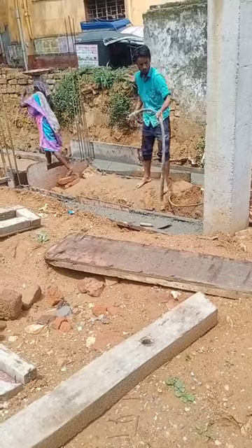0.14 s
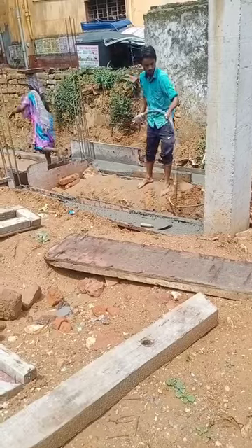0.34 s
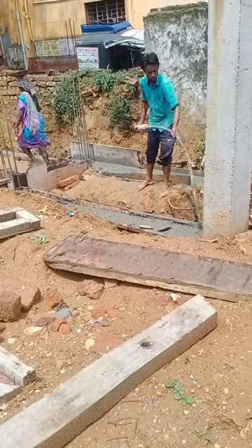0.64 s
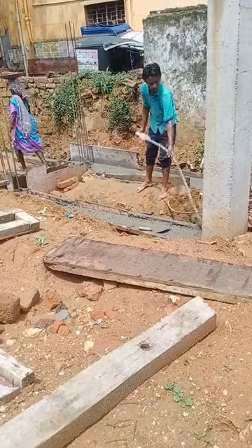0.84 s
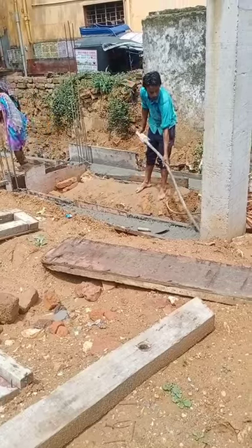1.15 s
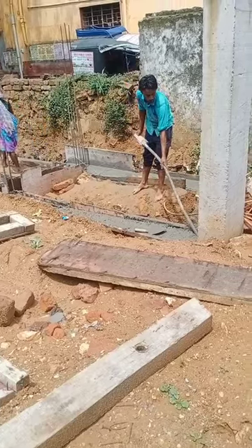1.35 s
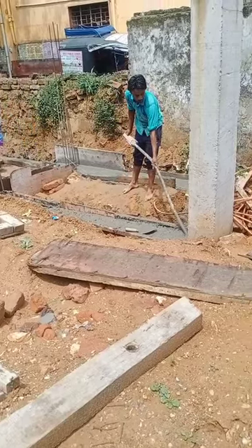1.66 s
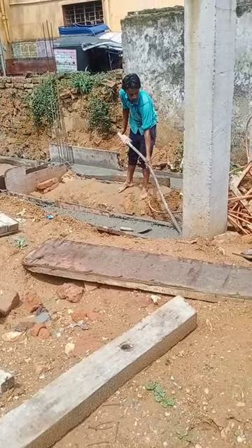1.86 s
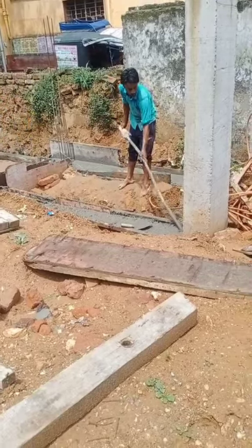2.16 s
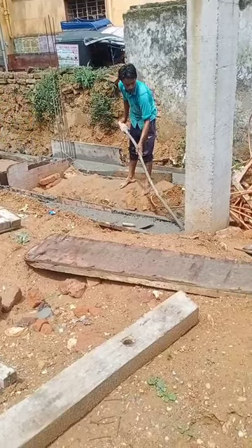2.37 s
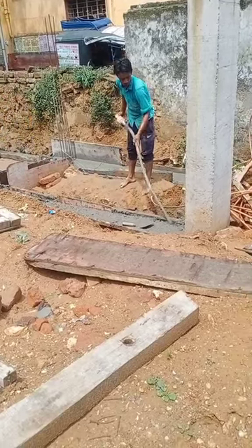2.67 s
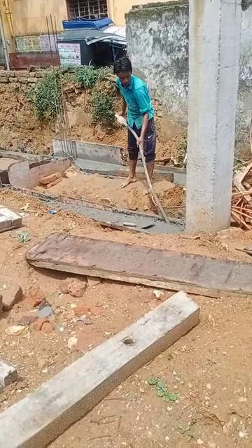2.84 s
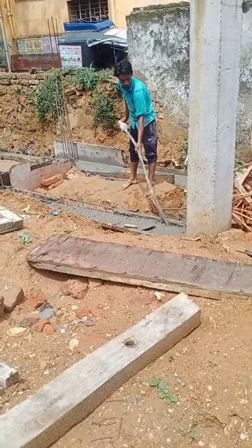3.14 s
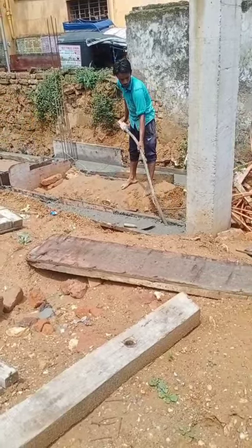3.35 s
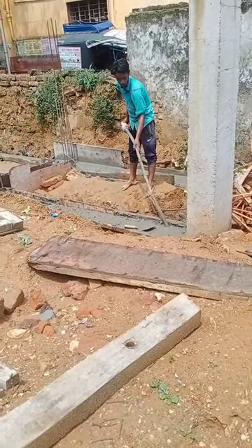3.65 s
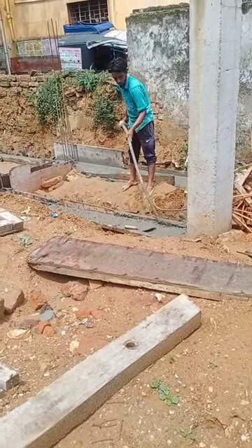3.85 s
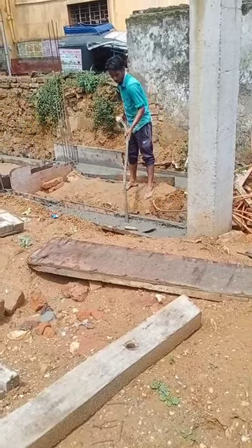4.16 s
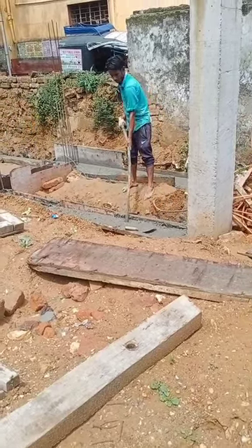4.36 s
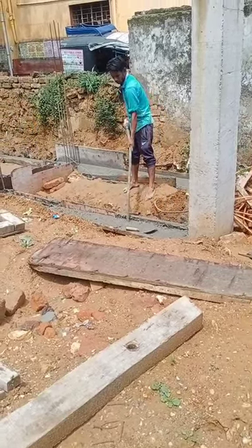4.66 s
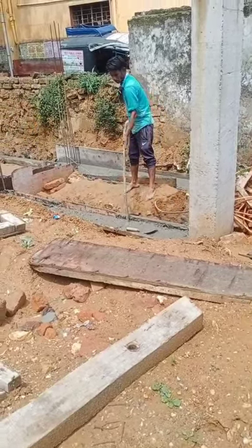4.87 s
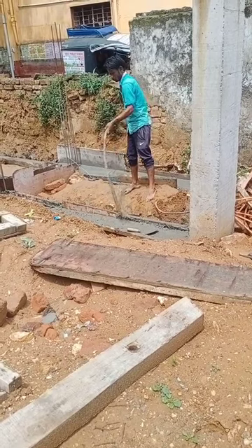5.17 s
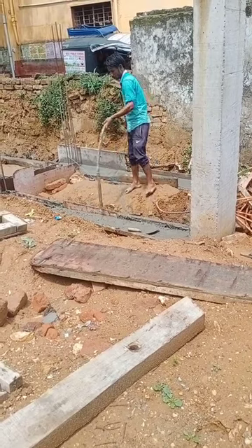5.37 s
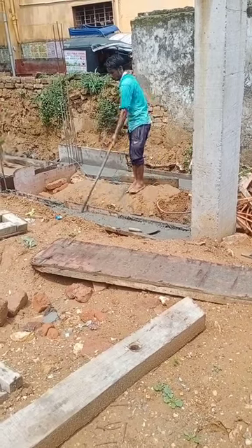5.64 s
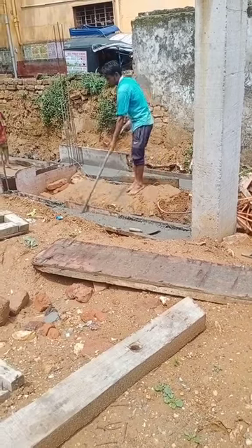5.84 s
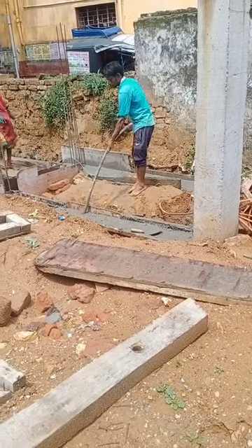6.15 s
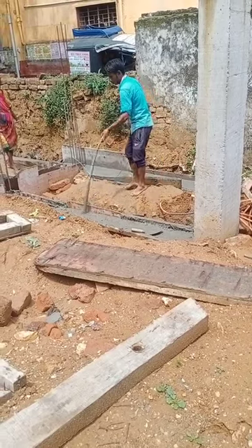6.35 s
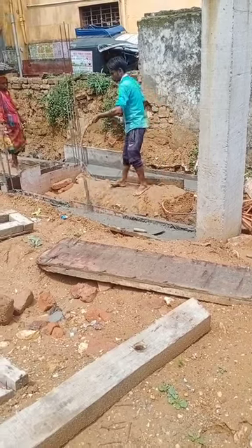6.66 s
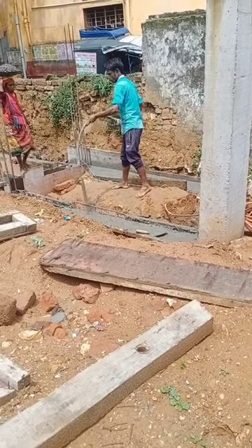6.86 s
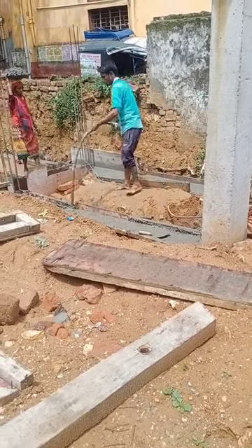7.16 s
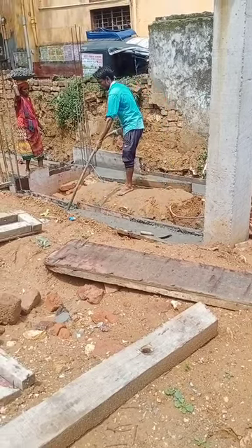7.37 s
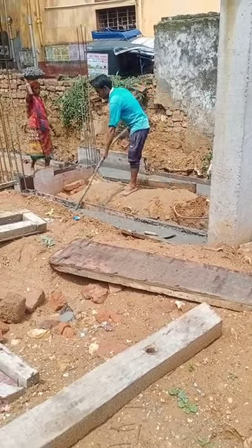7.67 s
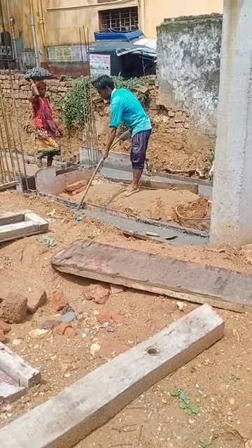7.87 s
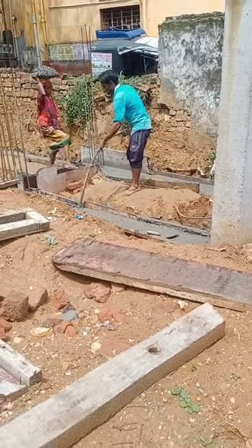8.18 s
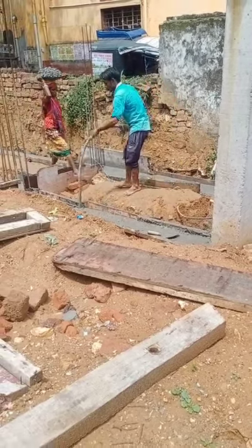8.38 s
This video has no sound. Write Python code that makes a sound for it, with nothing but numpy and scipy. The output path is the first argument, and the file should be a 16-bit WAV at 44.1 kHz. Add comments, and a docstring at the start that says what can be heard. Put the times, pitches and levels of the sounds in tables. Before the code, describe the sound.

A concrete vibrator runs without a break on an open building site, a motor-like hum under a bright, rasping steel rattle. Five times the needle sinks into fresh concrete: the hum drops, turns rough and buzzes while the mix grumbles, then it climbs again. Brief high squeals and ringing come from the steel. The air rumbles softly, a far engine drones faintly, and a short low thud comes just past the middle.

```python
"""A needle vibrator, a steel tube with a spinning weight inside, is dipped five times into fresh concrete.
The weight (the rotor) hums, slowing and turning rough whenever the concrete grips it. Rotor and
flexible shaft rattle in their casing, which rings now and then, and the needle squeals against steel.
The shaken mix grumbles and the air of the open building site rumbles. A far engine gives faint,
climbing drones, and there is one short, louder low thud at about 5.2 s."""
import sys
import numpy as np
from scipy import signal
from scipy.fft import rfft, irfft
from scipy.io import wavfile
from scipy.ndimage import uniform_filter1d

SR = 44100
rng = np.random.default_rng(int(sys.argv[2]) if len(sys.argv) > 2 else 0)


def unload_wav(signal):
    """Save mono or channel-first audio to the path in sys.argv[1] as 16-bit WAV at rate SR, clipped to [-1, 1]."""
    wavfile.write(
        sys.argv[1],
        SR,
        np.round(np.clip(np.atleast_2d(signal).T, -1, 1) * 32767).astype(np.int16),
    )


N = 375423
TIME = np.arange(N) / SR
FREQS = np.maximum(np.fft.rfftfreq(2 ** 19, 1 / SR), 1)
FREE_HZ = 269.66  # rotor turns per second with the needle in the air

# dips of the needle: start/s, pulled out/s, time to sink/s, slowing by drag/Hz, hum level/dB,
# grip of the concrete/0-1, slap of the bent shaft/0-1
DIPS = [(0.838, 2.448, 0.67, 47, -30, 0.44, 0.42), (2.645, 3.881, 0.47, 48, -29, 0.47, 0.26),
        (4.167, 5.169, .5, 43.2, -24, 0.67, 0), (5.691, 6.547, .15, 56, -27.5, .5, 0.3),
        (7.42, 8.702, 0.073, 53, -26, 0.31, 0.47)]


def from_db(db):
    return 10 ** (np.asarray(db) / 20)


def rms_one(x):
    """Scale a signal to an average strength (rms) of 1."""
    return x / np.sqrt(np.mean(np.abs(x) ** 2) + 1e-20)


def level_curve(points):
    """Join (time, level) points with straight lines."""
    return np.interp(TIME, *np.transpose(points))


def between(start, end, fade_s):
    """Fade in from start, hold at 1, fade out by end."""
    return np.clip(np.minimum(TIME - start, end - TIME) / fade_s, 0, 1)


def swell(middle, half_s):
    """A smooth rise and fall of height 1."""
    return np.exp(-((TIME - middle) / half_s) ** 2)


def drift(rate_hz):
    """A smooth random wobble of typical size 1; a higher rate wobbles faster."""
    r = np.exp(-80 * np.pi * rate_hz / SR)
    noise = rng.standard_normal(N // 40 + 2002)  # one value every 40 samples
    slow = signal.lfilter([1], [1, -2 * r, r * r], noise)[2000:]
    return np.interp(np.arange(N) / 40, np.arange(len(slow)), rms_one(slow))


def filtered(x, gain):
    """Turn each frequency up or down by its own gain."""
    return irfft(rfft(x, 2 * len(FREQS) - 2) * gain)[:N]


def coloured(x, spectrum):
    """Give x a tone colour that rings after each hit, never before it (minimum phase)."""
    hz, db = np.transpose(spectrum)
    gain = from_db(np.interp(np.log(FREQS), np.log(hz), db))
    cepstrum = irfft(np.log(gain))
    response = np.exp(rfft(2 * cepstrum[:len(FREQS) - 1], len(cepstrum)))
    return rms_one(filtered(x, response))


def resonance(x, hz, width_hz):
    """Let x ring at one pitch; a narrower width rings longer."""
    r = np.exp(-np.pi * width_hz / SR)
    section = [1, 0, -1, 1, -2 * r * np.cos(2 * np.pi * hz / SR), r * r]
    return rms_one(signal.sosfilt([section, section], x))


def needle_depths(pull_out_s=.1):
    """Depth from 0 to 1, one row per dip: the needle sinks steadily, stays, and comes out quickly."""
    return np.array([np.clip((TIME - start) / sink_s, 0, 1) * np.clip((end - TIME) / pull_out_s, 0, 1)
                     for start, end, sink_s, *_ in DIPS])


def rotor_speed(drag_hz, grip, inertia_s=.277, start_lag_hz=14, waver_hz=1.96):
    """The heavy rotor takes time to slow down or speed up; gripping concrete makes it waver."""
    r = np.exp(-1 / (inertia_s * SR))
    lost_hz = signal.lfilter([1 - r], [1, -r], drag_hz, zi=[start_lag_hz])[0]
    return FREE_HZ - lost_hz + waver_hz * grip * drift(7.79)


def hum_gains(depth, held_db, turn, grip, sputter_db=3.0):
    """Strength of the low hum, which sputters under load, and of the buzz an octave above it."""
    # the needle presses on something hard (+) or slips off (-): middle/s, half length/s, change/dB
    jolts = [(1.14, 0.12, -10), (1.335, 0.014, 9), (1.92, 0.087, 7), (1.987, 0.02, -14),
             (2.093, 0.047, 8.5), (2.193, .03, -14), (2.595, 0.89, -2), (3.07, 0.047, 7.5),
             (5.102, 0.04, -14), (5.967, 0.052, -9), (6.154, 0.044, 7.5), (6.378, 0.064, 11),
             (6.446, .015, -8), (6.701, 0.18, -6), (7.87, 0.21, 8.5), (8.322, 0.069, -11)]
    # the needle bites on stones and buzzes: start/s, end/s, level/dB
    bites = [(0.88, 1.155, -46), (1.2, 2.126, -44), (2.102, 2.494, -39.5), (2.59, 2.965, -46.5),
             (2.95, 3.224, -34.5), (3.23, 3.895, -33), (4.264, 4.565, -42.5), (4.586, 4.895, -33.5),
             (4.92, 5.22, -32.5), (5.806, 6.117, -37), (6.116, 6.542, -36), (7.48, 7.825, -44),
             (7.95, 8.599, -42)]
    free_db = -32 + 4 * turn  # needle in the air
    jolts_db = sum(db * swell(middle, half_s) for middle, half_s, db in jolts)
    low_db = free_db * (1 - depth.sum(0)) + held_db @ depth + jolts_db
    low_db += sputter_db * grip * drift(14.3)
    buzz = sum(from_db(db) * between(start, end, fade_s=.07) for start, end, db in bites)
    return from_db(low_db), from_db(-66.5) + buzz


def rotor_hum(angle, grip, turn, low_gain, octave_gain):
    """The off-centre rotor shakes the needle: smooth when free, unsteady when stones jostle it."""
    # overtones and bearing whine: multiple of the rotor speed, relative level free/dB, fully gripped/dB
    whine_tones = [(3, -69.5, -36.5), (5.3, -40, -76), (6, -42.5, -69), (7.7, -48, -31), (8, -38, -48),
                   (8.25, -39.5, -44), (10, -40, -54), (12, -37, -56)]

    def tone(multiple, rough, rate_hz):
        shake = 1 + rough * (drift(rate_hz) + 1j * drift(rate_hz))  # wobbles loudness and pitch
        return np.sqrt(2) * np.real(shake * np.exp(1j * multiple * angle)) / np.sqrt(1 + 2 * rough ** 2)

    low = low_gain * tone(0.99, rough=.07 + 0.34 * grip ** 2, rate_hz=22)
    octave = octave_gain * tone(2, rough=0.48, rate_hz=24.3)
    whine = sum(from_db(free + (held - free) * grip) * tone(multiple, rough=0.99, rate_hz=9.9)
                for multiple, free, held in whine_tones)
    return low + octave + from_db(-3.0 + 3.5 * turn) * whine


def steel_hits(angle, slap, hits_per_s=9000, shaft_per_rotor=.258):
    """Countless tiny hits of steel on steel, harder once per rotor turn and once per shaft turn."""
    sizes = from_db(2.5 * np.minimum(rng.exponential(1, N), 3.5)) * rng.choice([-1, 1], N)
    shaft_angle = shaft_per_rotor * angle
    shaft_swing = np.cos(shaft_angle) + 0.21 * np.cos(2 * shaft_angle)
    force = np.exp(0.089 * np.cos(angle) + .58 * slap * shaft_swing)
    force /= np.sqrt(uniform_filter1d(force ** 2, size=3000))  # keep the pulsing, even out the loudness
    struck = rng.random(N) < hits_per_s / SR
    flutter = from_db(0.83 * drift(23))
    return rms_one(sizes * struck * force * flutter)


def shifting_tones(x, patchy_db=3.0):
    """As hose and needle move, their many narrow ringing tones swell and fade."""
    bands = signal.stft(x, nperseg=1024)[2]
    patches = uniform_filter1d(rng.standard_normal(bands.shape), size=16, axis=1)
    bands = bands * from_db(patchy_db * rms_one(patches))
    return rms_one(signal.istft(bands)[1][:N])


def rattle(hits, turn, speed, band_edges_hz=(570, 2500, 4900, 8800)):
    """The hits sound through hose and casing: a clatter, a bright rasp and a fizz on top."""
    # tone colour of the steel casing and hose: f/Hz, relative level/dB
    steel_colour = [(330, -46), (560, -17), (617, -23.5), (709, -14.5), (874, -9), (1030, -13.5),
                    (1360, -5), (2410, -5.5), (3810, -3.5), (4960, -5.5), (5700, 5), (6370, 4), (9140, -36),
                    (14700, 9), (15500, -10)]
    # loudness of the hose's clatter: t/s, relative level/dB
    clatter_levels = [(0.12, -29), (0.68, -28.5), (0.79, -30), (1.46, -27), (1.79, -30.5), (3.11, -27),
                      (3.25, -29), (5.13, -25.5), (5.52, -30), (5.92, -24.5), (6.08, -28.5), (7.52, -29.5),
                      (8.08, -36), (8.45, -29.5)]
    # loudness of the bright rasp: t/s, relative level/dB
    rasp_levels = [(.1, -24.5), (2.2, -25.5), (2.9, -24), (4.2, -26), (5.6, -23.5), (8.5, -22)]
    # tone colour of each hit's sharp edge: f/Hz, relative level/dB
    fizz_colour = [(6000, -34), (8500, -4), (9200, -10), (10500, -5.5), (11300, -8), (12800, 0.5),
                   (15500, 0.5)]
    steel = coloured(shifting_tones(hits), steel_colour)
    above = [1 / (1 + (hz / FREQS) ** 20) for hz in band_edges_hz]  # each passes what lies above its edge
    hose_db = level_curve(clatter_levels) - 1.85
    casing_db = -21 - 2.5 * turn
    rasp_db = level_curve(rasp_levels) - 0.83
    body = sum(from_db(db) * rms_one(filtered(steel, above[k] - above[k + 1]))
               for k, db in enumerate([hose_db, casing_db, rasp_db]))
    fizz_db = -36.0 + 0.0446 * (speed - FREE_HZ)  # a faster rotor strikes more sharply
    return body + from_db(fizz_db) * coloured(hits, fizz_colour)


def casing_ring(hits, wander_db=1.5):
    """Where nothing muffles the steel, the hits build up ringing tones."""
    # steel tones that sing faintly throughout: f/Hz, width/Hz, level/dB
    lasting_tones = [(7326, 45, -47), (8242, 70, -57), (10165, 130, -66)]
    # tones that ring for a while: start/s, end/s, f/Hz, width/Hz, level/dB; the 1625 Hz and 1405 Hz rows are
    # the rotor's whine at about 6 and 5.3 times its speed
    passing_tones = [(.05, .58, 3700, 1100, -27.5), (.5, .9, 1625, 25, -38), (.5, .9, 7345, 30, -38),
                     (.62, 1.05, 3217, 22, -27.5), (1.0, 2.42, 3640, 300, -28), (1.1, 1.6, 1950, 130, -33),
                     (2.4, 3.1, 8250, 70, -52), (2.6, 4.4, 7326, 25, -42), (5.1, 5.36, 7326, 25, -34),
                     (6.8, 7.45, 1405, 30, -38), (6.8, 7.25, 7326, 30, -40), (7.55, 8.3, 3600, 480, -30)]
    ring = sum(from_db(db + wander_db * drift(1.2)) * resonance(hits, hz, width)
               for hz, width, db in lasting_tones)
    for start, end, hz, width, db in passing_tones:
        ring += from_db(db) * between(start, end, fade_s=.07) * resonance(hits, hz, width)
    return ring


def needle_squeal(pitch_hz=3889, waver_hz=6, chatter_db=2.5):
    """The needle rubs on steel and keeps one high, chattering tone going."""
    # short bursts and one weaker, longer rub: start/s, end/s, level/dB
    rubs = [(.1, .24, -22.5), (3.27, 4.17, -28.5), (3.53, 3.625, -26.5), (3.665, 3.745, -24),
            (3.81, 3.89, -26.5), (3.94, 3.99, -27.5)]
    rub = sum(from_db(db) * between(start, end, fade_s=.016) for start, end, db in rubs)
    angle = 2 * np.pi * np.cumsum(pitch_hz + waver_hz * drift(27.0)) / SR
    return rub * from_db(chatter_db * drift(38)) * np.sqrt(2) * np.sin(angle)


def concrete_grumble(grip):
    """The shaken mix churns with a low grumble, louder the harder it grips."""
    # tone colour of the churning mix: f/Hz, relative level/dB
    mix_colour = [(25, -80), (60, -40), (110, -5), (190, 6), (240, 8.5), (340, -4.5), (480, -6), (650, -19),
                  (1200, -56)]
    return from_db(-37 + 2.0 * drift(24)) * grip * coloured(rng.standard_normal(N), mix_colour)


def air_rumble(air_db=-62, waver_db=3.0):
    """The open air rumbles softly, and one gust stirs it."""
    # tone colour of the open air: f/Hz, relative level/dB
    air_colour = [(20, -7), (60, 0), (110, 3), (300, -8), (2000, -28)]
    # the gust: middle/s, half length/s, rise/dB
    gust = (5.8, 0.83, 12)
    middle, half_s, rise_db = gust
    level_db = air_db + rise_db * swell(middle, half_s) + waver_db * drift(4)
    return from_db(level_db) * coloured(rng.standard_normal(N), air_colour)


def far_engine_and_thud(waver_db=6.1):
    """Faint, climbing drones of a far engine, and one short, louder low thud at about 5.2 s."""
    # three engine drones and the thud (third row): start/s, end/s, first f/Hz, last f/Hz, level/dB
    low_tones = [(1.994, 3.056, 88.4, 103, -52), (4.05, 4.65, 159, 168, -46.5),
                 (5.12, 5.35, 164, 167, -37.5), (5.546, 5.944, 170, 181, -49)]
    sound = np.zeros(N)
    for start, end, first_hz, last_hz, db in low_tones:
        hz = np.interp(TIME, [start, end], [first_hz, last_hz])
        gain = from_db(db + waver_db * drift(35)) * between(start, end, fade_s=0.11)
        sound += gain * np.sqrt(2) * np.sin(2 * np.pi * np.cumsum(hz) / SR)
    return sound


def scene(free_grip=0.1, free_slap=0.034):
    """The dips slow the rotor, and that one speed drives both hum and rattle."""
    depth = needle_depths()
    drag_hz, held_db, held_grip, held_slap = np.transpose(DIPS)[3:]
    grip = np.clip(free_grip + (held_grip - free_grip) @ depth, 0, 1)
    slap = np.clip(free_slap + (held_slap - free_slap) @ depth, 0, 1)
    # from 2 to 6 s the worker turns and leads the hose to the other side, shifting the sound's balance
    turn = np.interp(TIME, [2.0, 6.0], [0, 1])
    speed = rotor_speed(drag_hz @ depth, grip)
    angle = 2 * np.pi * np.cumsum(speed) / SR
    hits = steel_hits(angle, slap)
    low_gain, octave_gain = hum_gains(depth, held_db, turn, grip)
    hum = rotor_hum(angle, grip, turn, low_gain, octave_gain)
    vibrator = hum + rattle(hits, turn, speed) + casing_ring(hits) + needle_squeal()
    return (vibrator + concrete_grumble(grip) + air_rumble() + far_engine_and_thud())[None]


def record(dry, start_s=.086, cutoff_hz=15600):
    """The sound comes in after a moment of silence; the highest treble is cut."""
    fade_in = np.clip((TIME - start_s) / .01, 0, 1)
    low_pass = signal.ellip(12, .1, 90, cutoff_hz, fs=SR, output="sos")
    return signal.sosfilt(low_pass, dry * fade_in)


dry = scene()
out = record(dry)
unload_wav(out)
```